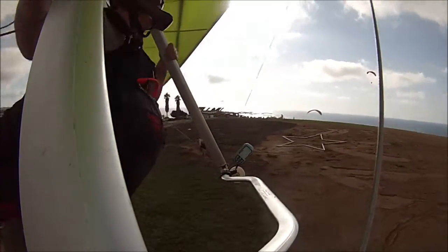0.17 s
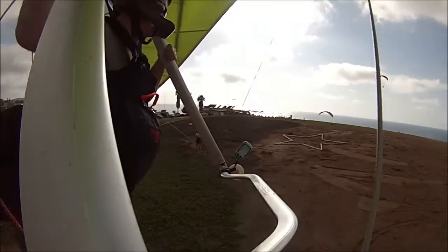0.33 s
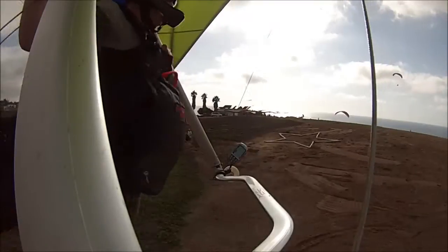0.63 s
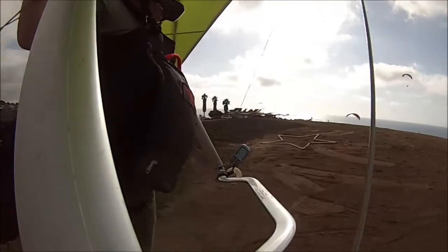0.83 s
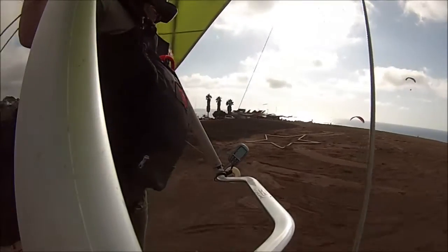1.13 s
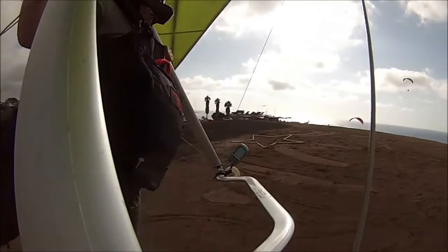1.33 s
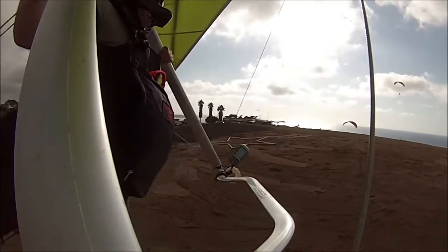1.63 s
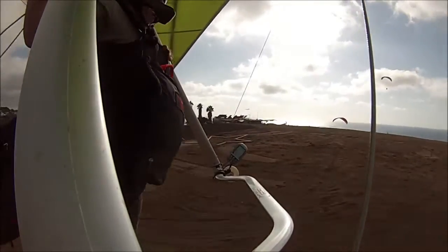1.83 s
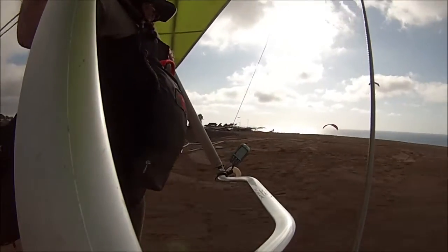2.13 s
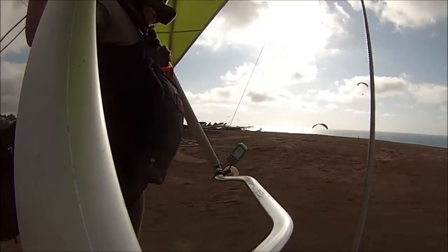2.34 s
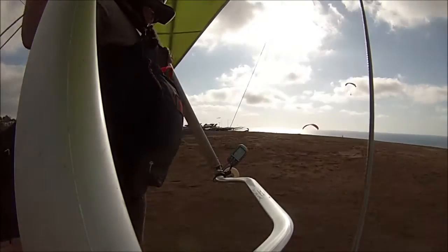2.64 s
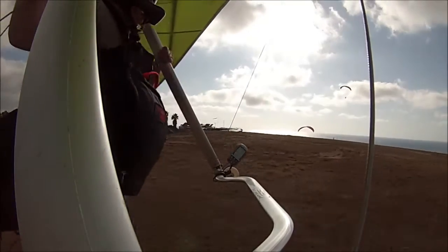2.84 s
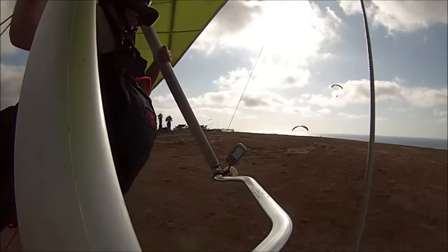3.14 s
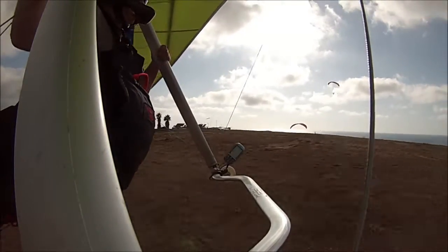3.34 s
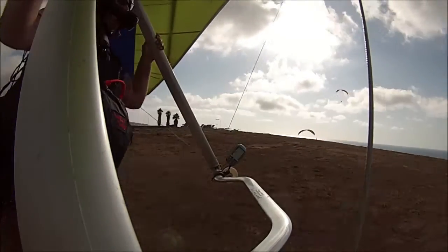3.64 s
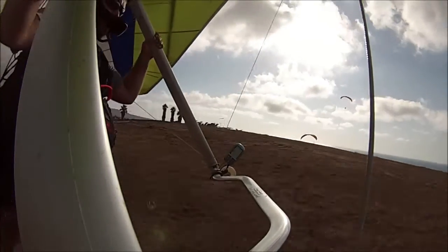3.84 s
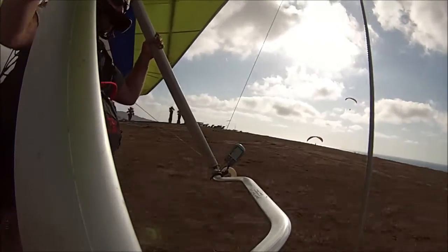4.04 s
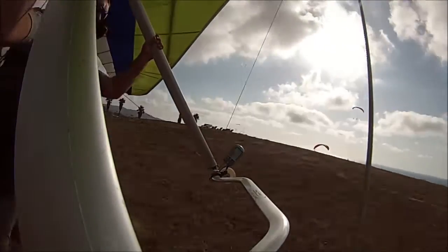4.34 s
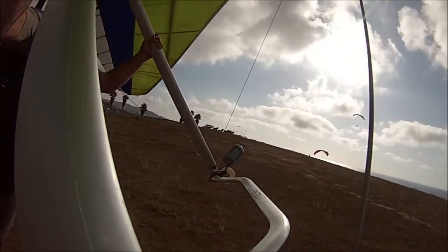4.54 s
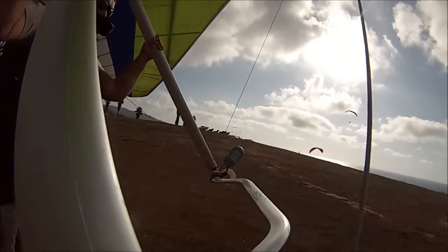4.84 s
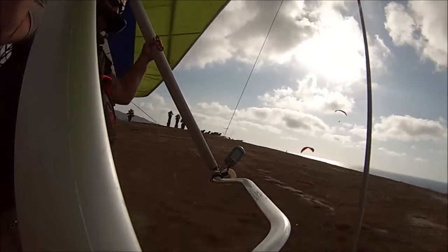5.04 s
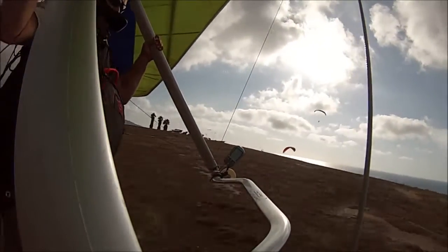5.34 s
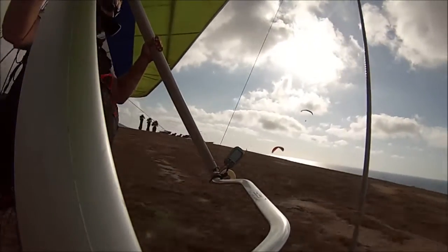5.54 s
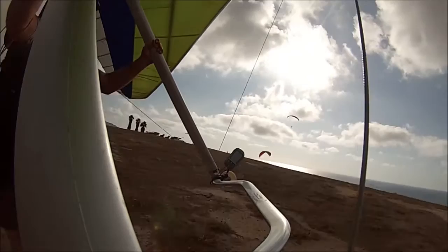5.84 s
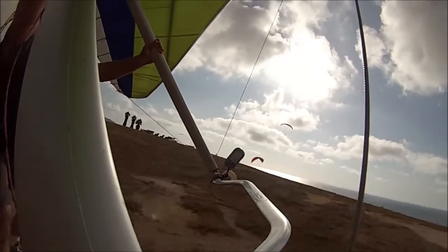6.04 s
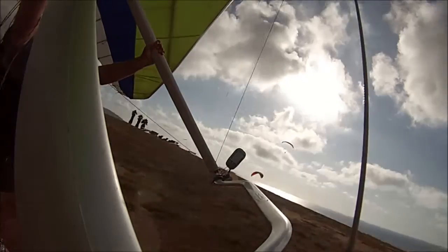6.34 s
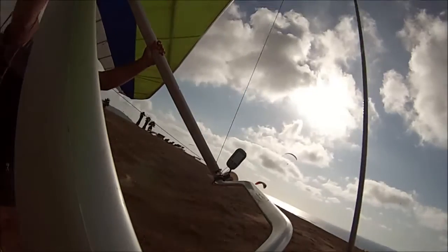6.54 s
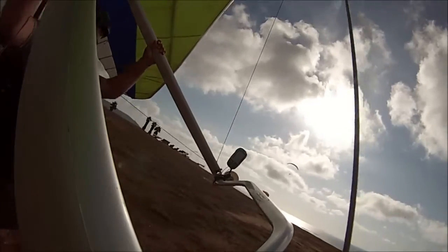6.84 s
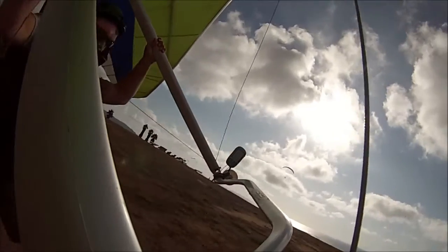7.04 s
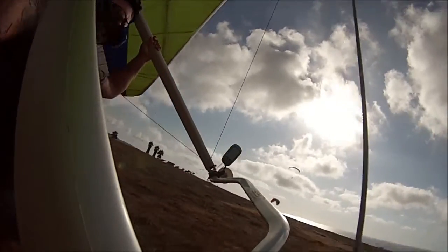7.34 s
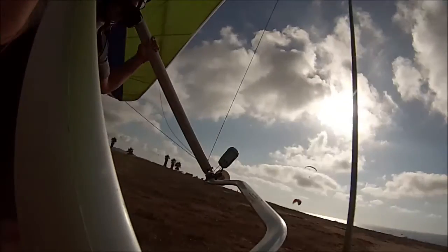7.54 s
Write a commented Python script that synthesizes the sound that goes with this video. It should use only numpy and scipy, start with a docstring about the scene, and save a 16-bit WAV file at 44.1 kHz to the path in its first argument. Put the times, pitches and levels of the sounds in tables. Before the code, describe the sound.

Loud rumbling airflow roars around a camera housing, with one early knock, later scattered clacks and a dense hollow burst of tube rattling and rubbing.

```python
"""A windy cliff top, a camera clamped to the frame of a hang glider, the microphone port out in the air.
Gusts buffet the port and roar round the housing: shaped noise, puffs and single thumps of pressure.
Fittings knock on the tubes, heard through the frame as decaying modes with a dry crack and a scrape.
Sharp ticks land on the housing; later a hand or strap slides along the tubes as grainy hiss and drone."""
import sys
import numpy as np
from scipy import signal
from scipy.fft import rfft, irfft, next_fast_len
from scipy.io import wavfile
from scipy.ndimage import uniform_filter1d, minimum_filter1d, map_coordinates

SR = 44100
rng = np.random.default_rng(int(sys.argv[2]) if len(sys.argv) > 2 else 0)


def output_pcm(signal):
    """Save a mono or channel-first signal as 16-bit PCM at the path in sys.argv[1].

    Samples are clipped to [-1, 1] before scaling.
    """
    pcm = np.clip(np.atleast_2d(signal).T, -1, 1) * 32767
    wavfile.write(sys.argv[1], SR, np.round(pcm).astype(np.int16))


N = 339040  # samples


def amp(db):
    """Gain of a level in dB."""
    return 10 ** (np.asarray(db) / 20)


def unit(x):
    """x at rms 1."""
    return x / np.sqrt(np.mean(x ** 2) + 1e-20)


def curves(rows):
    """One value per sample for each column after the time."""
    s, *cols = np.transpose(rows)
    return [np.interp(np.arange(N) / SR, s, c) for c in cols]


def wobble(rate):
    """A smooth random curve, rate knots a second."""
    return map_coordinates(rng.standard_normal(int(N * rate / SR) + 4), [np.arange(N) * rate / SR])


def filtered(x, response):
    """x times a response of frequency."""
    m = next_fast_len(N + 8192)
    return irfft(rfft(x, m) * response(np.fft.rfftfreq(m, 1 / SR)), m)[..., :N]


def coloured(x, spectrum):
    """x shaped by (Hz, dB) points on a log axis, at rms 1."""
    f, db = np.transpose(spectrum)
    return unit(filtered(x, lambda hz: amp(np.interp(np.log(hz + 1), np.log(f + 1), db))))


def patchy(depth_db):
    """White noise with patches of random gain over time and frequency."""
    z = signal.stft(rng.standard_normal(N), nperseg=512)[2]
    field = uniform_filter1d(rng.standard_normal(z.shape), size=8, axis=0)
    field = uniform_filter1d(field, size=6, axis=1)
    return signal.istft(z * amp(depth_db * unit(field)), nperseg=512)[1][:N]


# big eddies at the port: [t/s, sway level/dB, buffet level/dB]
EDDIES = [(0, -21.5, -13), (.15, -21.5, -22), (.4, -21, -18), (1.6, -23, -18.5), (2.1, -20, -19),
          (2.6, -19.5, -20), (3.2, -22.5, -19), (3.9, -19, -20.5), (5.5, -20.5, -18), (6.2, -20, -20.5),
          (6.35, -16.5, -23), (6.6, -20.5, -16), (6.75, -17, -26), (6.95, -27.5, -19.5), (7.08, -22, -33.5),
          (7.2, -29.5, -26.5), (7.37, -14.5, -27.5), (7.52, -25, -42), (7.58, -16, -29.5),
          (7.69, -28.5, -34.5)]
# air round the housing between the puffs: [t/s, hiss level/dB, roar level/dB]
FLOW = [(0, -34.5, -22.5), (.14, -44, -31.5), (.2, -40, -30.5), (.55, -30, -21), (1.25, -34.5, -22.5),
        (1.35, -34.5, -25), (1.95, -32.5, -23), (2.05, -39.5, -28.5), (2.2, -34, -24.5), (2.58, -35, -24),
        (2.65, -41.5, -27.5), (3.3, -43, -30), (3.48, -46, -33), (3.85, -43, -30), (4.07, -49, -32),
        (4.2, -35, -24.5), (4.45, -35.5, -23), (4.75, -42.5, -23.5), (5.2, -34.5, -25.5), (5.32, -42, -25),
        (5.9, -36, -25), (6.05, -45.5, -29), (6.4, -38, -30.5), (6.46, -51, -34), (6.6, -46.5, -33.5),
        (6.69, -49, -34), (6.76, -55, -43), (6.9, -52, -38.5), (7.2, -44.5, -31), (7.69, -47, -38)]
# short puffs of faster air: [peak t/s, rise in level/dB, length/s]
PUFFS = [(0.072, 3.5, 0.02), (0.233, 10.5, 0.17), (0.836, 2, 0.049), (1.03, 3, 0.064), (1.223, 2.5, 0.06),
         (1.444, 4.5, 0.042), (1.492, 6, 0.054), (1.93, 2.5, 0.085), (2.449, 4, 0.065), (2.796, 8.5, 0.083),
         (3.04, 1.5, 0.057), (3.206, 10, 0.072), (3.353, 5, 0.12), (3.588, 8, 0.15), (3.842, 5, 0.014),
         (3.886, 8.5, 0.0096), (3.902, 5, 0.084), (4.248, 3.5, 0.047), (4.279, 5.5, 0.021),
         (4.423, 4.5, 0.022), (4.708, 6, .012), (4.887, 8.5, 0.013), (5.1, 2, 0.039), (5.224, 7, 0.02),
         (5.251, 5, 0.012), (5.43, 3.5, 0.016), (5.468, 5.5, 0.12), (5.637, 6.5, 0.025),
         (5.693, 7.5, 0.031), (5.73, 9.5, 0.044), (5.935, 7.5, 0.045), (6.144, 1.5, 0.057),
         (6.196, 4, 0.019), (6.287, 11, 0.059), (7.3, 10, 0.2)]
# hardest single thumps of air at the port: [t/s, pressure size, below zero a suck]
THUMPS = [(0.081, -.45), (0.753, -.4), (0.896, .4), (1.041, .4), (1.17, -0.35), (1.369, -.45),
          (1.495, 0.55), (1.525, .4), (1.633, -0.4), (1.815, -0.49), (1.993, .55), (2.052, -0.44),
          (2.149, -0.29), (2.332, -0.37), (2.484, -.4), (2.609, 0.44), (3.226, -.45), (3.413, -0.55),
          (3.638, -0.57), (4.279, -0.51), (4.434, -.55), (4.709, 0.5), (4.861, -0.6), (5.235, -0.47),
          (5.483, -0.46), (5.859, .45), (5.894, -.45), (6.133, 0.3), (6.282, 0.5), (6.566, .3),
          (6.588, -.7), (6.765, -0.17), (6.798, -0.23), (6.84, -0.25), (6.908, -0.21), (6.958, -0.12),
          (7.043, -.16)]
# lift of the hiss's top treble: [t/s, level/dB]
TREBLE = [(0, 6), (.7, 3), (1.2, 0), (3, 2.5), (4.5, -6.5), (5.4, -7.5), (6.5, 0), (7.69, 2)]
# slowest pressure swings at the port: [f/Hz, relative level/dB per Hz]
SWAY = [(8, -17), (20, -7.5), (40, 0), (70, 0), (110, -24.5), (200, -30.5), (400, -81.5)]
# slower swings in the lee of the wing: [f/Hz, relative level/dB per Hz]
LEE_SWAY = [(8, -8.5), (18, -6.5), (32, 3), (55, -2.5), (90, -22), (200, -42), (400, -84)]
# quicker pressure swings at the port: [f/Hz, relative level/dB per Hz]
BUFFET = [(30, -45.5), (60, -6), (90, -2.5), (150, -6), (230, -11.5), (320, -14), (500, -22), (800, -30),
          (1500, -100)]
# roar in the housing: [f/Hz, relative level/dB per Hz]
ROAR = [(120, -8), (200, -2.5), (230, -2), (317, -11), (445, -6), (620, -7.5), (893, -6), (1170, -13),
        (1600, -26), (2080, -49.5), (3520, -120)]
# fine eddies: [f/Hz, relative level/dB per Hz]
HISS = [(800, -15), (1150, -7), (1350, -7), (1800, -2), (2250, -12.5), (2500, -11), (2800, -9),
        (3100, -14.5), (3450, -17), (4400, -25), (5300, -25), (6200, -33.5), (8000, -40), (10500, -47),
        (12500, -53.5), (15000, -79.5)]
LUMPS_DB, LUMPS_PER_S = 1.24, 35  # the big eddies come in lumps
GUST_ROAR = .7  # dB of roar per dB of a puff
LEE_S, TURN_S = 7.2, 0.12  # when the camera turns out of the wind, and how fast
THUMP_S = 0.0013  # half the width of a thump
REBOUND, REBOUND_S = 0.37, .004  # opposite swing: its size, and its width, which is half its delay
TREBLE_HZ = 7000


def wind():
    """Big eddies swing and pop the port; the small ones riding on them come in bursts."""
    t = np.arange(N) / SR
    sway_db, buffet_db = curves(EDDIES)
    hiss_db, roar_db = curves(FLOW)
    puffs_db = sum(db * np.exp(-(2 * (t - s) / length) ** 2) for s, db, length in PUFFS)
    swell_db = 0.5 * wobble(14)
    hiss_db = hiss_db + puffs_db + swell_db
    roar_db = roar_db + GUST_ROAR * puffs_db + swell_db + 1.25 * wobble(16)

    sway = coloured(amp(LUMPS_DB * wobble(LUMPS_PER_S)) * rng.standard_normal(N), SWAY)
    lee_sway = coloured(rng.standard_normal(N), LEE_SWAY)
    # an equal-power crossfade into the lee: angle from 0 to a quarter turn
    lee = np.pi / 4 * (1 + np.tanh((t - LEE_S) / TURN_S))
    sway = np.cos(lee) * sway + np.sin(lee) * lee_sway

    # single vortices breaking on the port, about 70 a second, each a pop of random size and sign
    pops = unit((rng.random(N) < 70 / SR) * rng.standard_normal(N))
    churn = amp(1.0 * wobble(60)) * rng.standard_normal(N) + amp(-7.0) * pops
    buffet = coloured(amp(LUMPS_DB * wobble(LUMPS_PER_S)) * churn, BUFFET)

    # roar and hiss share their bursts; the hiss adds a quicker flicker
    eddies, flutter = wobble(30), wobble(110)
    roar = coloured(amp(1.57 * eddies + 1.24 * flutter) * rng.standard_normal(N), ROAR)
    hiss_bursts = amp(0.5 * eddies + 0.9 * flutter + 1.8 * wobble(400))
    hiss = coloured(hiss_bursts * patchy(depth_db=1), HISS)
    top = filtered(hiss, lambda hz: hz ** 4 / (hz ** 4 + TREBLE_HZ ** 4))
    hiss = hiss + (amp(curves(TREBLE)[0]) - 1) * top

    def bump(s, width):
        """A smooth swing of pressure, a Gaussian in time."""
        return np.exp(-((t - s) / width) ** 2 / 2)

    thumps = sum(size * (bump(s, THUMP_S) - REBOUND * bump(s + REBOUND_S * 2, REBOUND_S))
                 for s, size in THUMPS)
    swings = amp(sway_db) * sway + amp(buffet_db) * buffet
    return thumps + swings + amp(roar_db) * roar + amp(hiss_db) * hiss


# knocks on the tubes: [t/s, ring peak level/dB, low favoured f/Hz, high favoured f/Hz,
# boost of the high one/dB, hardness/dB per octave, damping (1 = free ring)]
KNOCKS = [(0.217, -16, 583, 1880, 12, 4, 1.2), (5.525, -13.5, 900, 1850, 10, 3.5, 1.4),
          (5.676, -17, 900, 1900, 4, 0, 1.2), (5.687, -24, 825, 2500, 19, 11, 0.91),
          (5.805, -14.5, 1010, 2200, 0, -1.5, 1.5), (5.728, -17.5, 1100, 2740, 16, 12, 1.2),
          (6.026, -19, 1100, 1860, 10, 2, 1), (6.067, -25, 965, 1820, 18, -2, 1.4),
          (6.104, -18.5, 1000, 1900, 10, 0, 1.6), (6.126, -18, 965, 1960, 10, -5, 1.3),
          (6.162, -26, 965, 1800, 16, 4, 1.2), (6.224, -27, 965, 1810, 19, 1, 1.2),
          (6.264, -17, 1100, 1820, 15, 5.5, 1), (6.31, -23.5, 965, 1800, 18, 10, 1.4),
          (6.203, -15.5, 965, 1820, 8, -0.5, 2), (6.392, -16, 580, 1880, 10, -0.5, 0.65),
          (6.478, -13.5, 650, 2050, 14, -2, 0.9), (6.482, -13, 653, 2190, 3, -8, 0.87),
          (6.4905, -11, 650, 2700, 9, 6.5, 0.88), (6.496, -11, 650, 1820, 4, 0.5, 1.2),
          (6.512, -14, 990, 1896, 16, 0, 1.5), (6.818, -24, 590, 1900, 23, -0.5, 1.3),
          (6.852, -24, 650, 1930, 19, 0, 1.2), (6.897, -12.5, 650, 1880, 2, -12.5, 0.79),
          (6.954, -10.5, 1100, 3180, 7, 5.5, 1.35), (6.99, -21, 649, 1830, 17, -1.5, 1.1),
          (7.024, -7, 920, 2200, 4.5, 4.5, 0.68), (7.027, -10.5, 582, 1790, 14, -2, 1.2),
          (7.071, -21.5, 650, 1820, 14, -3, 0.75), (7.114, -20, 840, 1950, 21, -3, 0.93),
          (7.143, -9.5, 835, 2190, 8, -3.5, 1.04), (7.174, -11.5, 866, 2150, 4, 1.5, 1.4),
          (7.183, -16, 604, 1815, 20, -3.5, 0.82), (7.192, -12.5, 590, 1480, 15, 2, 1.5),
          (7.219, -14.5, 832, 3180, 6, 1, 1.2), (7.227, -15, 840, 1850, 8, -5, 1.3),
          (7.239, -14.5, 820, 1900, 8, -1, 1), (7.269, -6, 844, 1900, 14, 3, 0.81),
          (7.28, -7.5, 608, 1850, 6, -12, 1.4), (7.289, -12.5, 835, 1860, 12, 5, 1.8),
          (7.303, -13, 606, 1818, 17, -2, 0.77), (7.328, -15.5, 1010, 1900, 8, 6, 1.8),
          (7.316, -19, 840, 1820, 8, -2, 1), (7.345, -10, 580, 1880, 6, -2, 1.4),
          (7.366, -10, 650, 1880, 5, -5, 0.56), (7.379, -7, 1094, 2450, 6, 11.5, 2.3),
          (7.391, -3, 830, 1860, 5.5, 7, 1.3), (7.408, -13.5, 825, 3550, 7, 5, 1.5),
          (7.463, -16, 840, 1950, 10, -3, 1.7), (7.522, -23, 1090, 1880, 6, -7, 0.24),
          (7.561, -16.5, 600, 1880, 4, -11, 1.1), (7.582, -15, 885, 1900, 19, 5, 1.1),
          (7.621, -11.5, 830, 1900, 23, 2, 1.2), (7.644, -20, 820, 1480, 8, -2, 1.6),
          (7.666, -13, 850, 1890, 14, 3.5, 1), (7.682, -18, 590, 1880, 6, -7, 1)]
# modes of the tubes as the housing hears them, also stirred by the slides: [f/Hz, level/dB, t60/s]
TUBES = [(580, -1, 0.048), (643, -7, 0.086), (732, -10, .03), (846, -4, 0.06), (969, -3.5, 0.026),
         (1102, -3, 0.03), (1490, -11, 0.033), (1810, -12, 0.036), (1954, -13, 0.02), (2170, -9.5, 0.03),
         (2514, -23.5, 0.06), (2710, -18, 0.029), (2870, -27, 0.03), (3174, -14, 0.024),
         (3590, -17.5, 0.021), (3840, -29, 0.035), (4530, -34, 0.042), (5300, -39.5, .03)]
# skin or a scrape on a tube, shared with the slides: [f/Hz, relative level/dB per Hz]
RUB = [(1500, -23.5), (3000, -9), (3500, -14.5), (4100, -4.5), (4600, -4), (5300, 0.5), (6000, -11),
       (7000, -11.5), (8500, -21.5), (10000, -36), (11200, -20.5), (12800, -26), (13800, -59),
       (15000, -42.5)]
# dry crack at the start of a knock: [f/Hz, relative level/dB per Hz]
CRACK = [(400, -26), (900, -9), (1800, 2.5), (3400, -3.5), (4200, -14), (6000, -30.5), (12000, -53)]
# small steel fitting, a loud brief mode beating with a lower, lasting one: [f/Hz, level/dB, t60/s]
FITTING = [(3556, 0, .062), (3500, -13, .2)]
# knocks that reach the fitting: [t/s, level/dB]
CHINKS = [(0.2179, -24), (6.3579, -30), (6.4915, -20.5), (7.026, -21.5), (7.393, -27)]
STRIKE_S = .0018  # rise of a knock
DETUNE = .012  # spread of the modes' pitch from knock to knock
PLACE_DB, PLACE_OCTAVES = 11, 0.094  # boost of the low favoured pitch; reach of either one
CHATTER = 0.31  # depth of the roughness on a knock's ring
CRACK_DB, CRACK_T60_S = -18.5, 0.038


def knocks():
    """Every knock rings the same modes at new strengths, cracks and scrapes; a hard one favours the treble."""
    out, scrape, crack = np.zeros((3, N + SR))
    t = np.arange(SR // 8) / SR
    hz, level_db, t60 = np.transpose(TUBES)[:, :, None]
    luck = rng.standard_normal((len(KNOCKS), 3, len(TUBES), 1))
    rise = 1 - np.exp(-t / STRIKE_S)
    # the loose fitting chatters, which roughens the ring
    chatter = np.pad(1 + CHATTER * wobble(600), (0, SR))
    for knock, (strength, turn, bend) in zip(KNOCKS, luck):
        s, db, low_hz, high_hz, high_db, hard_db, damping = knock
        span = slice(round(s * SR), round(s * SR) + len(t))
        # where the blow lands decides which modes it stirs most
        place_db = sum(boost_db * np.exp(-(np.log2(hz / c) / PLACE_OCTAVES) ** 2)
                       for c, boost_db in ((low_hz, PLACE_DB), (high_hz, high_db)))
        mode_db = level_db + place_db + hard_db * np.log2(hz / 1200) + 2.2 * strength
        gain = amp(mode_db - 60 * t * damping / t60)
        modes = gain * np.sin(2 * np.pi * (hz * (1 + DETUNE * bend) * t + turn))
        ring = np.sum(modes, axis=0) * rise * chatter[span]
        out[span] += amp(db) * ring / np.abs(ring).max()
        scrape[span] += amp(db + 1.1 * hard_db - 35.5 - 60 * t / 0.027) * rise
        crack[span] += amp(db + hard_db + CRACK_DB - 60 * t * damping / CRACK_T60_S) * rise
    chink = rise * sum(amp(db - 60 * t / life) * np.sin(2 * np.pi * c * t) for c, db, life in FITTING)
    for s, db in CHINKS:
        out[round(s * SR):][:len(t)] += amp(db) * chink
    scrapes = scrape[:N] * coloured(rng.standard_normal(N), RUB)
    cracks = crack[:N] * coloured(rng.standard_normal(N), CRACK)
    return out[:N] + scrapes + cracks


# tiny sharp ticks, grit or a strap end on the housing: [t/s, relative level/dB]
TICKS = [(0.323, -14), (1.992, -30.5), (2.574, -35), (3.412, -35), (3.8821, -37), (4.125, -36),
         (4.138, -37.5), (4.24, -32), (4.285, -31), (4.304, -32.5), (4.454, -31), (4.462, -33.5),
         (4.71, -36.5), (4.886, -34), (5.004, -37), (5.236, -35.5), (5.5258, -37.5), (6.1787, -25),
         (6.289, -22), (6.343, -25), (6.4276, -22), (6.545, -37.5), (6.588, -29.5), (6.671, -32.5),
         (7.2185, -30.5), (7.3818, -11), (7.5235, -33.5)]


def ticks():
    """Each tick is a noise crack of about a millisecond, dulled by the housing."""
    out, t = np.zeros(N + SR), np.arange(SR // 100) / SR
    cracks = rng.standard_normal((len(TICKS), len(t))) * amp(-60 * t / 0.0052)
    for (s, db), crack in zip(TICKS, cracks):
        out[round(s * SR):][:len(t)] += amp(db + 4.5) * crack / np.abs(crack).max()
    return filtered(out[:N], lambda hz: hz ** 2 / (hz ** 2 + 2000 ** 2) / (1 + (hz / 6500) ** 3))


# strokes of a hand or strap on a tube: [start t/s, length/s, hiss level/dB, tube drone level/dB]
SLIDES = [(4.285, 0.035, -54, -46), (4.347, 0.082, -56, -46), (4.452, 0.018, -49, -46),
          (5.644, .015, -58, -42), (5.728, 0.022, -50, -34.5), (5.836, 0.5, -53.5, -41),
          (6.252, 0.086, -42, -34), (6.35, 0.066, -48, -51), (6.463, 0.14, -58, -41),
          (6.65, .09, -62.5, -46.5), (6.794, 0.37, -63.5, -44), (7.235, 0.15, -36.5, -28.5),
          (7.376, 0.095, -43.5, -30.5), (7.48, 0.1, -52, -32.5), (7.586, .15, -56, -36.5)]
GRIP_S, LET_GO_S = 0.025, 0.016  # time per 20 dB as a stroke sets in, and as it dies
DRONE_TILT_DB = -2  # per octave: soft skin stirs the low modes most
SLIPS_PER_S, SLIP_DB = 91, -1.5  # skin sticks and slips; slips over the steady drag


def slides():
    """Skin drags over the tube in fine grains: a smooth hiss, and a drone where it stirs the tube's modes."""
    t = np.arange(N) / SR

    def shape(s, length):
        """Gain of one stroke: it sets in before its start and dies after its end."""
        outside = np.maximum((s - t) / GRIP_S, (t - s - length) / LET_GO_S)
        return amp(-20 * np.clip(outside, 0, 6))

    hiss, drone = sum(amp([[hiss_db], [drone_db]]) * shape(s, length)
                      for s, length, hiss_db, drone_db in SLIDES)
    grains = amp(1.2 * wobble(70) + 2.2 * wobble(300) + 1.5 * wobble(25)) * patchy(depth_db=1.2)
    drag = amp(3 * wobble(90) + 2.5 * wobble(20)) * rng.standard_normal(N)
    slips = (rng.random(N) < SLIPS_PER_S / SR) * rng.standard_normal(N)
    judder = unit(drag) + amp(SLIP_DB) * unit(slips)

    def modes(f):
        """Response of the tube: resonances of alternating sign, wider the faster they die."""
        total = 0
        for k, (c, db, t60) in enumerate(TUBES):
            loss = 1j * f * 2.2 / t60  # 2.2 / t60 is the bandwidth in Hz
            gain = (-1) ** k * amp(db + DRONE_TILT_DB * np.log2(c / 1000))
            total = total + gain * loss / (c * c - f * f + loss)
        return total

    return hiss * coloured(grains, RUB) + drone * unit(filtered(judder, modes))


def scene():
    """Wind on the port plus what the frame and housing carry, in one channel."""
    return (wind() + knocks() + ticks() + slides())[None]


TOP_HZ = 15450  # band limit


def record(dry):
    """A limiter turns the tallest swings down for some 20 ms; nothing passes above the band limit."""
    needed = np.minimum(1, .72 / (np.abs(dry) + 1e-9))
    gain = uniform_filter1d(minimum_filter1d(needed, size=600), size=500)
    return filtered(dry * gain, lambda hz: hz < TOP_HZ)


dry = scene()
out = record(dry)
output_pcm(out)
```